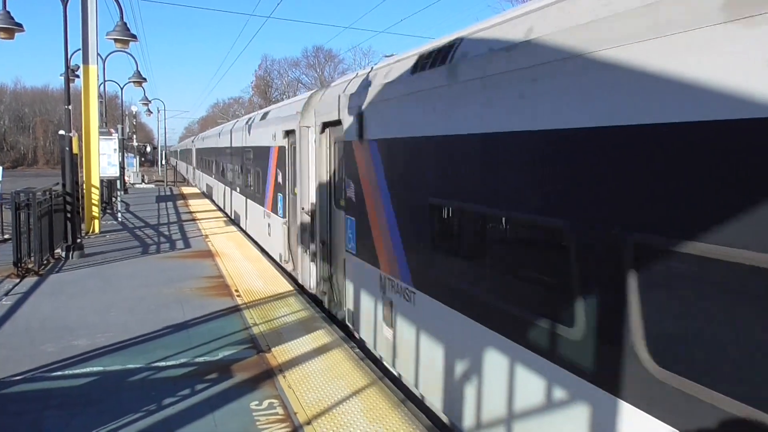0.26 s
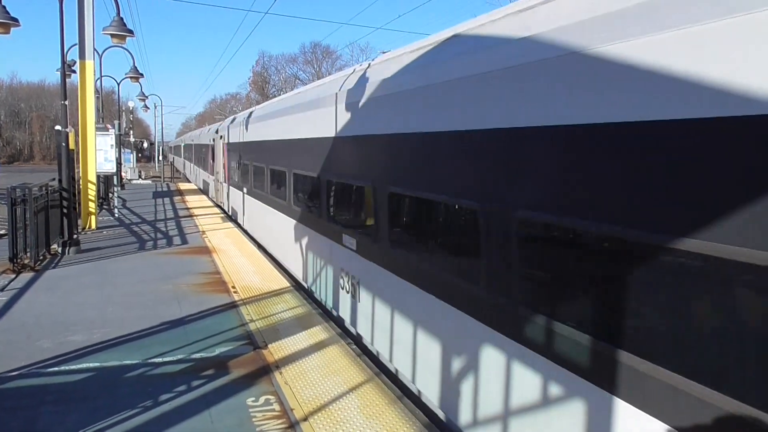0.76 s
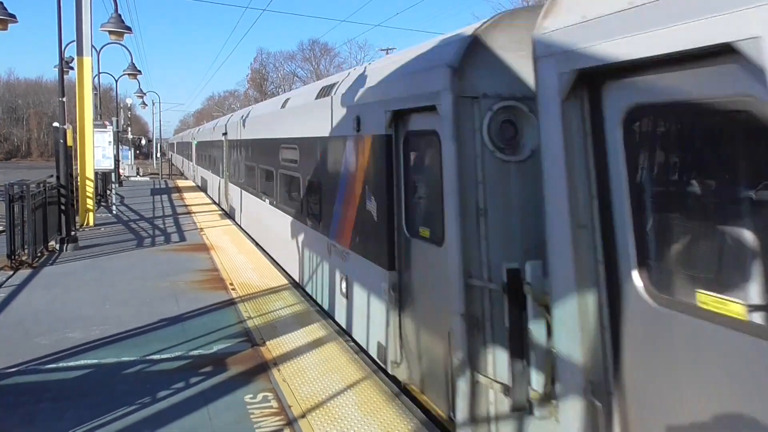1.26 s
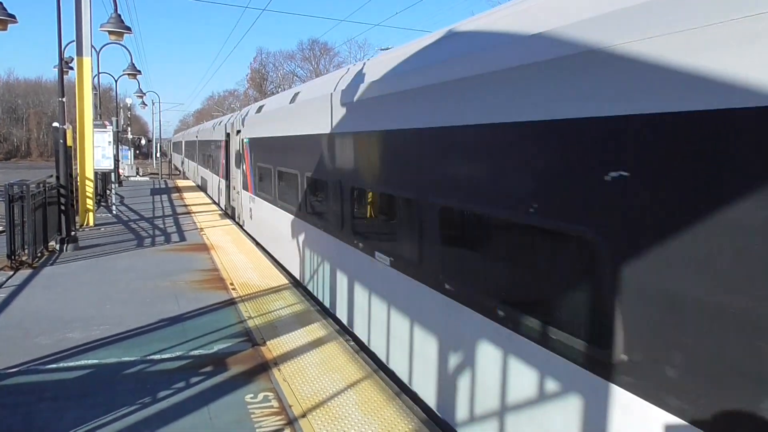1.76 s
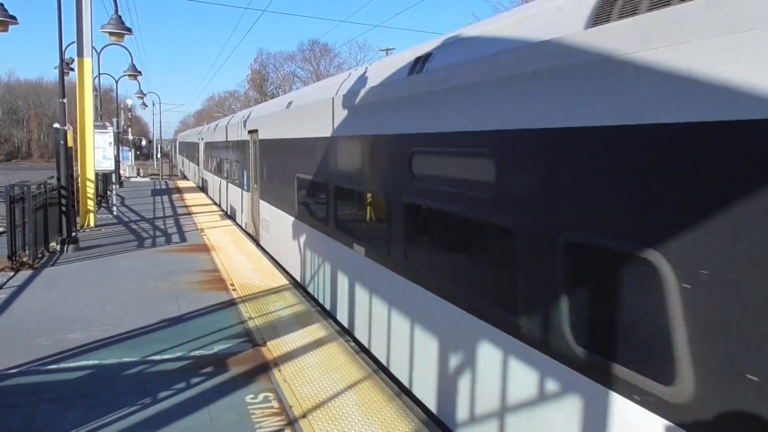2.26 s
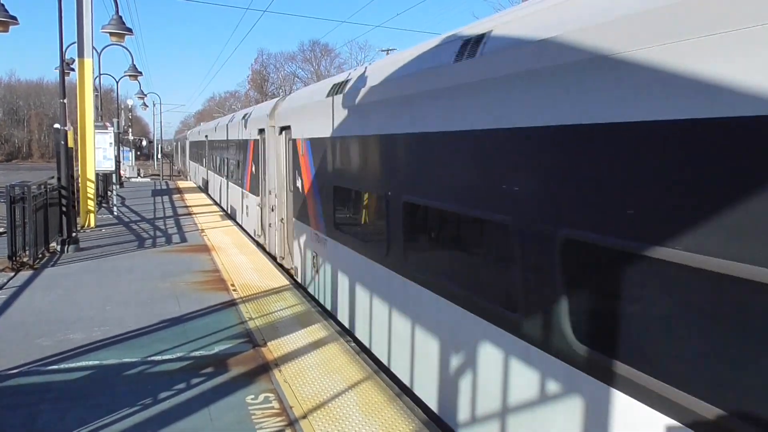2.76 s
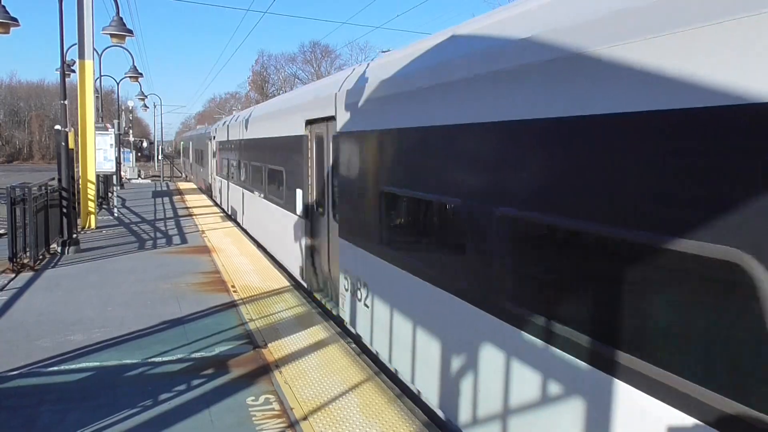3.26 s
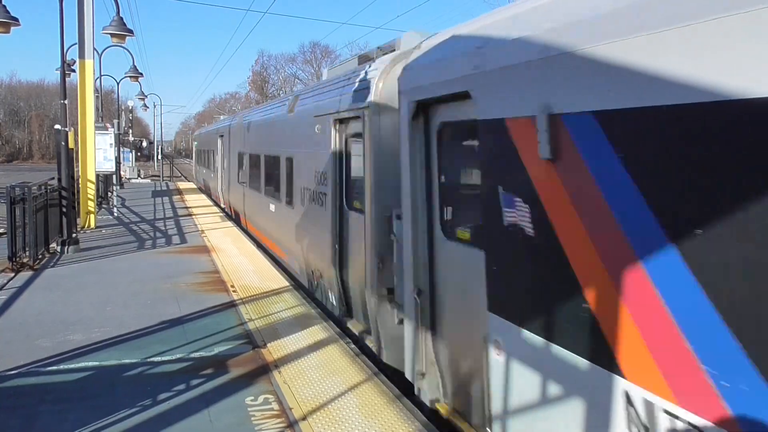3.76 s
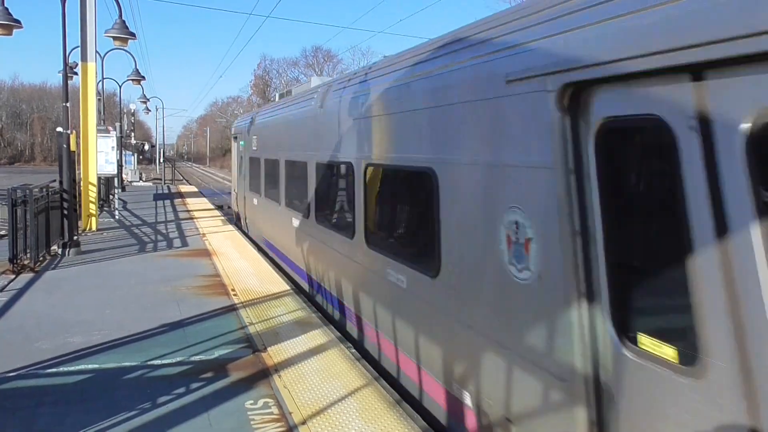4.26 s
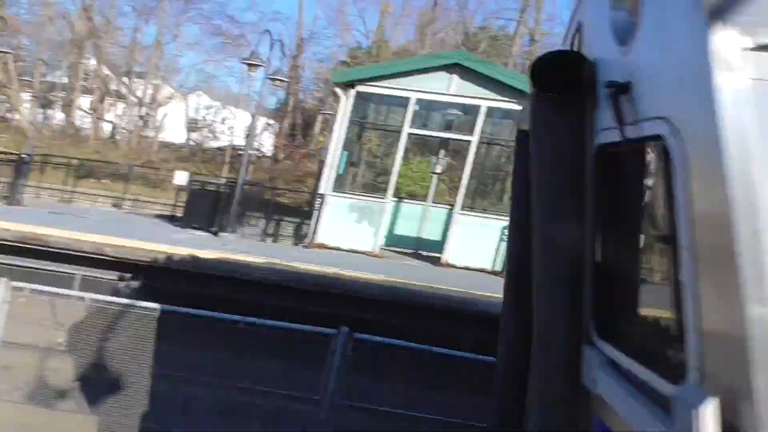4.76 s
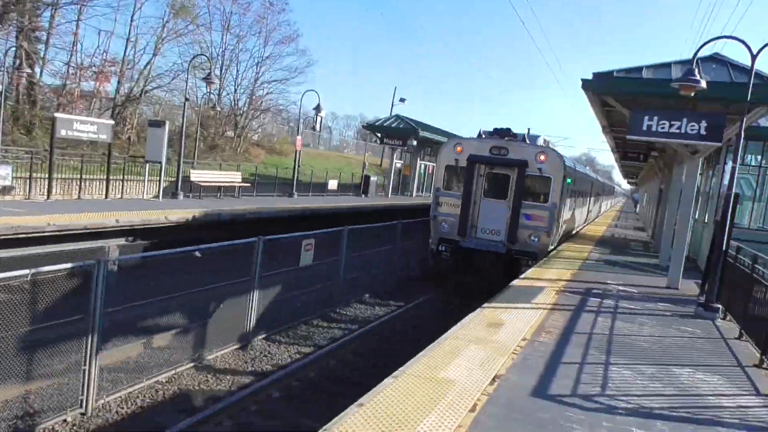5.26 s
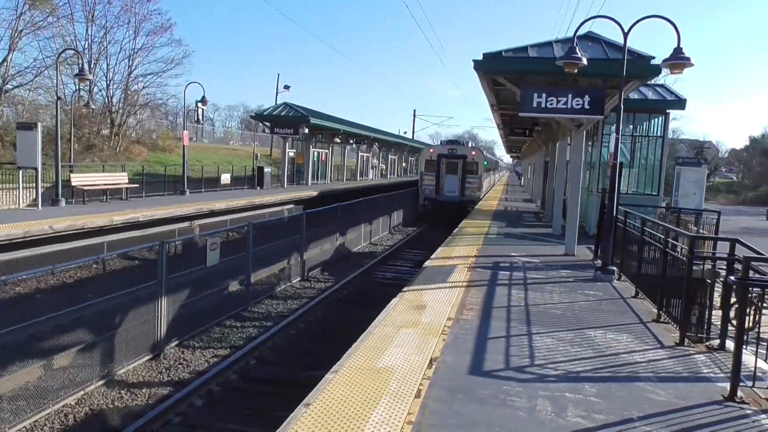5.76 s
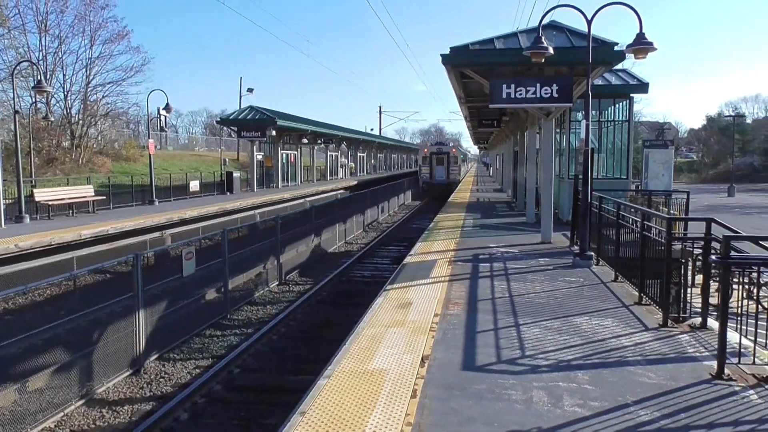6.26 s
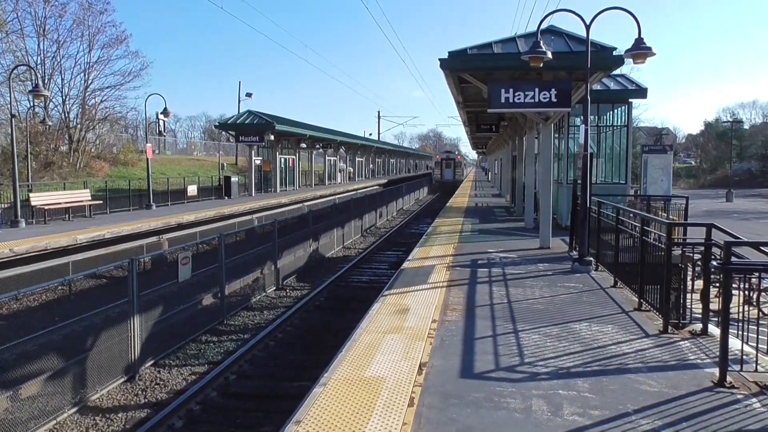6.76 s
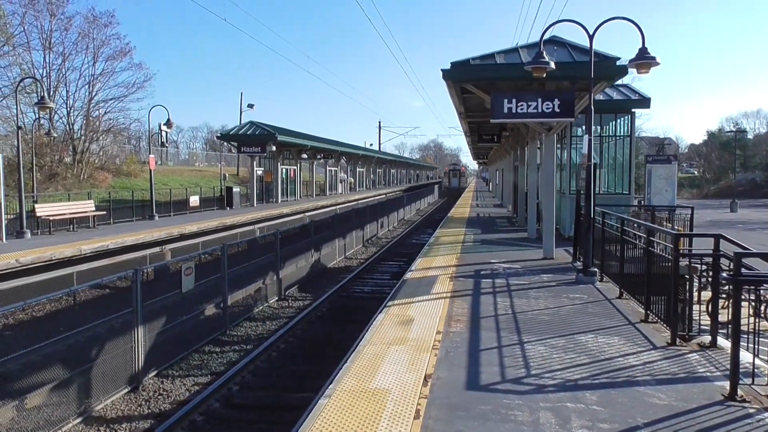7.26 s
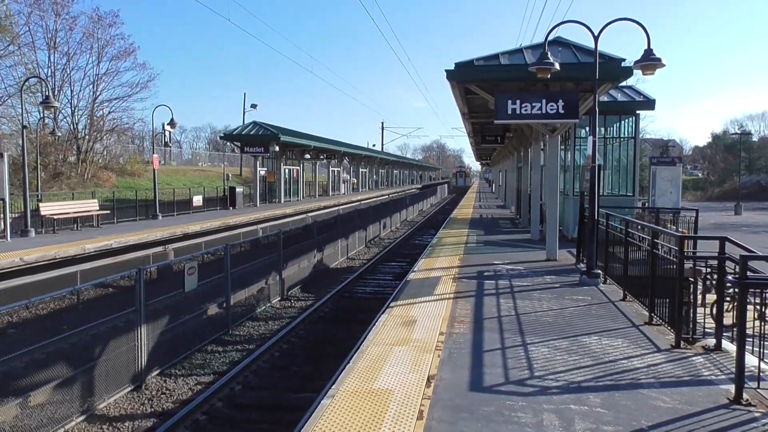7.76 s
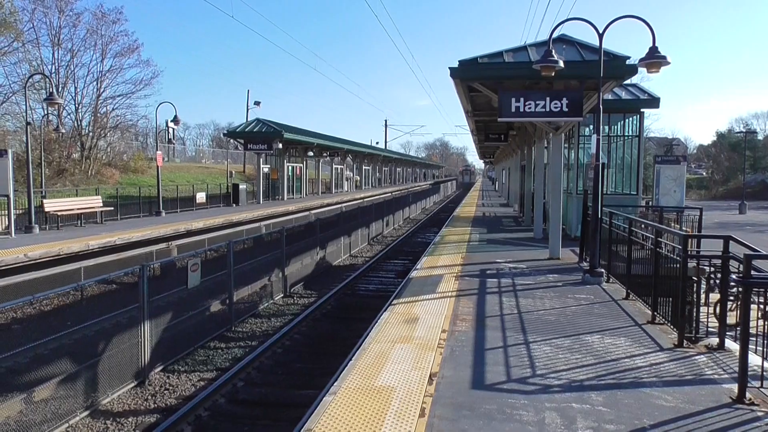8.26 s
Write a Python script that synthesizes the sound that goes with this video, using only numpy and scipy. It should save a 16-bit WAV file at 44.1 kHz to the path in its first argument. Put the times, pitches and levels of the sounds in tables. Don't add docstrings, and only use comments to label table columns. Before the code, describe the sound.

Outdoors on a station platform, a long electric passenger train rushes past at arm's length: broad wheel roar over a wavering low hum, hollow booms at coach gaps, hissing bogies. Dull knocks and sharp rail-joint clacks come midway. After the last coach passes, the roar dulls and recedes, while gusts of slipstream thump the stereo microphone and the image narrows to mono.

```python
import sys
import numpy as np
from scipy import signal
from scipy.fft import rfft, irfft, next_fast_len
from scipy.io import wavfile

SR = 44100
rng = np.random.default_rng(int(sys.argv[2]) if len(sys.argv) > 2 else 0)


def wav_out(sig):
    wavfile.write(sys.argv[1], SR, np.round(np.clip(np.atleast_2d(sig).T, -1, 1) * 32767).astype(np.int16))


N = 375732
PADDED = next_fast_len(N)
HZ = np.fft.rfftfreq(PADDED, 1 / SR) + 1e-3

# (time [s], 0 alongside to 1 far)
DISTANCE = [
    (0, 0.066),
    (4.6, 0.013),
    (5.0, 0.5),
    (5.5, 0.86),
    (6.2, 0.88),
    (7.0, 0.94),
    (8.52, 0.93),
]
# (frequency [Hz], side over the width [dB], right-louder share, right-earlier share)
STEREO_IMAGE = [(60, -9, .05, .1), (200, -16, .1, .5), (300, -2, 0.088, .7), (700, 3, .15, 0.23),
                (2500, 4.5, 0.48, .15), (7000, 7.5, .05, .35), (10000, 15, 0.14, .3),
                (13000, 12.5, 0.49, .2)]


def undb(db):
    return np.exp(np.asarray(db) * (np.log(10) / 20))


def rms_one(x):
    return x / np.sqrt(np.mean(x ** 2) + 1e-20)


def in_time(rows):
    s, *columns = np.transpose(rows)
    return [np.interp(np.arange(N) / SR, s, c) for c in columns]


def at_hz(points, hz, column=1):
    points = np.array(points)
    return np.interp(np.log(hz), np.log(points[:, 0]), points[:, column])


def back(bins):
    return irfft(bins, PADDED)[..., :N]


def drift(rate):
    r = np.exp(-80 * np.pi * rate / SR)
    slow = signal.lfilter([1], [1, -2 * r, r * r], rng.standard_normal(N // 40 + 2002))[2000:]
    return np.interp(np.arange(N) / 40, np.arange(len(slow)), rms_one(slow - slow.mean()))


def coloured(spectrum):
    white = rfft(rng.standard_normal(PADDED))
    return rms_one(back(white * undb(at_hz(spectrum, HZ))))


def swell(s, half):
    out, half = np.zeros(N), max(half, .01)
    first, last = round((s - 5 * half) * SR), round((s + 5 * half) * SR)
    near = np.arange(max(first, 0), min(last, N))
    out[near] = np.exp(-.5 * ((near / SR - s) / half) ** 2)
    return out


def train_levels(far):
    # (time [s], level [dB])
    roar_weight = [(0, -20.5), (.28, -20), (.65, -21.5), (.85, -20), (1.4, -20.5), (1.9, -17.5),
                   (2.45, -16.5), (3.0, -18.5), (3.83, -15.5), (4.0, -17), (4.5, -18), (5.25, -19.5),
                   (5.4, -22), (5.56, -18.5), (6.55, -19.5), (7.0, -24.5), (7.25, -22), (8.52, -28.5)]
    # (time [s], swell [dB], half length [s], brightness [dB])
    bogie_passes = [(.6, 8.5, .17, -0.5), (1.4, 10, .2, 0), (1.96, 1, 0.18, 2), (2.304, 7, 0.24, -1),
                    (3.15, 6.5, .12, 1), (3.962, 8.5, 0.27, -1), (4.504, -1, 0.087, 5.5),
                    (4.907, 9.5, 0.24, 1.5), (5.317, 0, 0.061, -1.5), (5.532, 3, 0.068, -0.5),
                    (6.112, 3.5, 0.22, 0.5), (6.67, 1.5, 0.18, 0.5), (7.24, 3, 0.056, 0),
                    (7.544, 5.5, 0.13, -1.5), (8.24, 1, 0.08, 0), (8.473, 0, 0.034, -1),
                    (2.665, 0, 0.039, -2.5)]
    # (share of roar, share of swell, share of brightness, step when far [dB], fade once gone [dB/s])
    upper_layers = [
        (0.44, 0.86, -0.23, 3.5, 1),
        (-0.019, 1.08, 0.56, 10.5, -4.5),
        (-0.068, .6, 1.5, 14.5, -0.5),
    ]
    tail_gone_s = 5.53
    roll, = in_time(roar_weight)
    lift, bright = sum(np.outer([db, tint_db], swell(s, half)) for s, db, half, tint_db in bogie_passes)
    gone_s = np.maximum(np.arange(N) / SR - tail_gone_s, 0)
    return np.array([roll, *np.array(upper_layers) @ [roll, lift, bright, far, gone_s]])


def rail_noise(roar, hiss, roar_db, hiss_db):
    tone = np.where(HZ < 2600, at_hz(roar, HZ) + roar_db, at_hz(hiss, HZ) + hiss_db)
    mid, own = rfft(rng.standard_normal((2, PADDED))) * undb(tone)
    louder, earlier = (np.clip(at_hz(STEREO_IMAGE, HZ, column=c), -.7, .7) for c in (2, 3))
    return mid, own, louder, earlier


def rolling(patchy_db, shared_db):
    # (frequency [Hz], level [dB per Hz])
    roar_near = [(25, -51), (60, -76), (120, -18.5), (225, -5.5), (300, -2), (430, -1), (720, -0.5),
                 (1040, -10), (1300, -15.5), (1620, -17.5), (1850, -27), (2100, -24), (2350, -28),
                 (2600, -36.5)]
    roar_far = [(25, -29), (100, -24), (200, -9), (300, -8.5), (430, -3.5), (600, 1), (800, 3),
                (1100, -6.5), (1500, -8.5), (1800, -24.5), (2150, -20), (2600, -35.5)]
    hiss_near = [(1530, -33), (2600, 0), (2740, -3), (3140, 1.5), (3560, -0.5), (4080, 2.5), (5460, -6),
                 (6890, -3.5), (8070, -4), (11900, -7), (15000, -20.5), (15600, -27)]
    hiss_far = [(2600, 0.5), (3750, 4), (4300, 0), (5700, -16.5), (7150, -10), (9300, -21), (9720, -18),
                (9950, -17), (10500, -5.5), (11500, -9.5), (11750, -6.5), (12050, -13), (13300, -12),
                (15600, -16)]
    # (time [s], slope [dB/octave])
    coach_tilt = [(0, 0), (2.1, -0.1), (3.85, 0.5), (4.15, -0.5), (4.5, 0.5), (4.9, -0.1), (6.6, -2.5),
                  (7.2, -1), (8.52, -1.3)]
    layer_hz = [700, 3600, 7500, 13000]
    facing_far = -.3

    far = np.clip(in_time(DISTANCE)[0], 0, 1)
    tilt, = in_time(coach_tilt)
    curves = train_levels(far)
    curves -= np.mean(curves, axis=1, keepdims=True)
    pairs = []
    for facing, source in [(1.0, rail_noise(roar_near, hiss_near, -3.5, -37.0)),
                           (facing_far, rail_noise(roar_far, hiss_far, -4.5, -37.0))]:
        mid, own, louder, earlier = source
        earlier = facing * earlier
        diffuse = np.sqrt(1 - louder ** 2 - earlier ** 2)
        side = diffuse * own - (louder + 1j * earlier) * mid
        pairs.append([mid, undb(at_hz(STEREO_IMAGE, HZ)) * side])
    pairs = np.array(pairs, np.complex64)

    octave = np.maximum(np.log2(HZ / 170), 0)
    together = drift(6.0) + .7 * drift(25.0)
    out = np.zeros((2, N))
    for step in np.arange(0, 7, .5):
        hz = 170 * 2 ** step
        band = np.clip(1 - np.abs(octave - step) * 2, 0, 1).astype(np.float32)
        near, away = back(pairs * band)
        place = np.interp(np.log(hz), np.log(layer_hz), range(4))
        low = min(int(place), 2)
        level_db = curves[low] + (place - low) * (curves[low + 1] - curves[low])
        level_db += tilt * np.interp(np.log2(hz / 620), [-1, 1, 2], [-1, 1, 0])
        flicker_db = patchy_db * drift(12.5)
        flicker_db = flicker_db + shared_db * min(hz / 4000, 1) * (1 - 0.87 * far) * together
        gone = far ** 2.5 if hz > 5000 else far
        out += undb(level_db + flicker_db) * (np.sqrt(1 - gone) * near + np.sqrt(gone) * away)
    return out


def hum(wobble_db, side_db):
    # (time [s], low tone [dB], upper tone [dB])
    tone_levels = [(0, -20.5, -18.5), (.2, -15.5, -18.5), (.72, -18.5, -19), (.95, -15, -27),
                   (1.1, -14, -18.5), (1.6, -19, -22), (2.08, -18.5, -26), (2.22, -27, -33),
                   (2.9, -31.5, -40), (3.6, -31, -40), (4.7, -52, -55), (5.15, -27, -34), (5.42, -36, -40),
                   (5.62, -24, -36), (6.5, -24.5, -31.5), (6.97, -33.5, -34), (7.2, -21.5, -27.5),
                   (8.52, -21.5, -29.5)]
    pitches_hz = [285.6, 350.2, 570.8, 393, 337, 474]
    # (follows low 0 or upper 1 tone, alongside [dB against it], far away [dB against it])
    partials = [
        (0, 1, 0),
        (1, -3.5, 0.5),
        (0, -44, -9.5),
        (1, -12, -6),
        (1, -9, -21),
        (1, -14, -16),
    ]
    levels_db, (far,) = in_time(tone_levels), in_time(DISTANCE)
    out = 0
    for hz, (upper, near_db, far_db) in zip(pitches_hz, partials):
        k = int(upper > .5)
        turn = 2 * np.pi * hz * np.arange(N) / SR + (.3 + .05 * k) * drift(2.5)
        level_db = levels_db[k] + near_db + far * (far_db - near_db)
        height = np.sqrt(2) * undb(level_db + wobble_db * (1.5 + .3 * k) * drift(12.4))
        side = -undb(side_db) * (1 - .55 * far) * np.cos(turn - .1)
        out = out + height * np.array([np.sin(turn), side])
    return out


def gusts():
    # (time [s], peak [dB], half length [s], common 1 to opposed 0)
    gust_events = [(.12, -36, 0.054, .4), (0.553, -40, .12, 0.76), (1.13, -31, 0.039, 0.41),
                   (1.393, -34.5, 0.13, 1), (1.65, -34, .12, 0.99), (2.18, -34, 0.11, 0.41),
                   (2.55, -36, .08, 0.17), (2.733, -33, .06, 0.18), (3.37, -39, .07, 0.88),
                   (3.816, -30, 0.1, 0.43), (4.204, -30, .12, 0.18), (4.567, -29.5, 0.12, .1),
                   (5.042, -18.5, 0.051, 0.24), (5.217, -27, 0.084, 0.18), (5.69, -35, .04, .2),
                   (5.867, -30, 0.06, 0.19), (6.12, -31, 0.15, .2), (6.3, -22, 0.08, .25),
                   (6.39, -24, 0.033, .1), (6.605, -16, 0.036, 0.17), (6.757, -14, 0.054, 0.64),
                   (6.877, -18, 0.016, 0.94), (7.06, -32, 0.04, 0.88), (7.353, -13.5, 0.028, 0.85),
                   (7.664, -16.5, 0.031, 0.99), (7.852, -21.5, 0.031, 0.97), (7.968, -21.5, 0.05, 1),
                   (8.118, -21, 0.034, 1), (8.356, -20, 0.062, 1), (8.453, -16.5, 0.041, 1),
                   (.45, -43, .08, .1), (2.24, -38, .04, .1), (3.8, -31, .03, .05), (4.303, -31.5, .03, .5),
                   (5.55, -42, 0.087, .1), (5.92, -31, .04, .1), (6.56, -26, .02, .6),
                   (6.92, -21.5, .02, 0.96), (7.13, -29, .03, 0.91), (7.243, -29, .04, 0.81),
                   (7.44, -25, 0.035, 1), (8.204, -27, .03, 0.99), (.8, -37, 0.12, 1), (7.5, -31, .04, 1),
                   (7.592, -30.5, .03, 0.98), (7.8, -28, .02, 1), (7.91, -27, 0.043, 1),
                   (8.04, -28, .03, 1), (8.27, -27, .04, 0.98), (1.9, -34.5, .07, 1)]
    breeze_db, breeze_opposed_db = -45, -51
    wake_s, wake_db = 7.05, -38
    wake = 1 / (1 + np.exp((wake_s - np.arange(N) / SR) / 0.13))
    common_power = undb(breeze_db) ** 2 + wake * undb(wake_db) ** 2
    opposed_power = (1 - wake) * undb(breeze_opposed_db) ** 2
    power = np.array([common_power, opposed_power])
    for s, peak_db, half, common in gust_events:
        common = np.clip(common, 0, 1)
        power += np.outer([common, 1 - common], undb(peak_db) * swell(s, half)) ** 2
    return np.sqrt(power)


def wind(air, lumpy_db, cycles):
    # (frequency [Hz], level [dB per Hz])
    buffet_colour = [(12, -55), (20, -30), (59, -7.5), (114, 3), (209, 0.5), (312, -3), (397, -9),
                     (600, -19), (780, -42), (1320, -120)]
    # (time [s], peak [dB], frequency [Hz], direction [degrees])
    hard_eddies = [(5.06, -17, 130, 120), (6.5666, -7, 200, 290), (6.588, 2, 170, 88), (6.61, -8, 100, 260),
                   (6.63, -10, 300, 90), (6.712, -13, 85, 87), (7.035, -17, 170, 0.0),
                   (6.655, -17, 90, 0.0), (6.6485, -1, 170, 255), (6.732, -6, 260, 125),
                   (6.749, -6, 238, 30), (6.875, -10, 200, 0.0), (7.347, -6.5, 230, 190),
                   (7.418, -6, 200, -1), (7.641, -8, 250, 183), (7.689, -12, 150, -1),
                   (7.96, -14, 150, 0.0), (8.136, -7, 172, 181), (8.353, -11, 220, 180),
                   (8.33, -14, 130, 0.0), (7.365, -11, 260, 0.0), (8.4252, -1.5, 172, 0.0)]
    lumps = [rms_one(coloured(buffet_colour) * undb(lumpy_db * drift(45.0))) for part in range(2)]
    out = undb(1.0) * air * lumps
    reach = SR // 40
    age = np.arange(-reach, reach) / SR
    for s, peak_db, hz, degrees in hard_eddies:
        push = undb(peak_db) * np.exp(-.5 * (age * hz / cycles) ** 2) * np.cos(2 * np.pi * hz * age)
        direction = [np.cos(np.radians(degrees)), np.sin(np.radians(degrees))]
        out[:, round(s * SR) - reach:][:, :len(age)] += np.outer(direction, push)
    return out


def ducking(air):
    above_db, share, release_db_per_s = -22.5, 0.63, 21
    attack_s, lag_s = 0.021, 0.023
    t = np.arange(N) / SR
    gust_db = 20 * np.log10(np.interp(t - lag_s, t, air[0]))
    over_db = share * np.maximum(gust_db - above_db, 0)
    held_db = np.maximum.accumulate(over_db + release_db_per_s * t) - release_db_per_s * t
    r = np.exp(-1 / (attack_s * SR))
    return undb(-signal.lfilter([1 - r], [1, -r], held_db))


def singing():
    # (time [s], centre [Hz], level [dB], half length [s])
    sung_bands = [(0.48, 7000, -52, 0.17), (.68, 4100, -50, .1), (1.28, 7000, -51, 0.14),
                  (1.3, 4100, -61, 0.12), (2.02, 837, -23.5, 0.37), (2.05, 7300, -49, 0.07),
                  (2.27, 644, -25, 0.18), (2.25, 3300, -51, 0.067), (2.5, 7200, -54, .08),
                  (2.95, 705, -20.5, 0.18), (2.87, 558, -20, 0.05), (3.25, 765, -32, 0.13),
                  (3.74, 820, -26, 0.17), (3.95, 485, -18, 0.043), (4.205, 464, -21.5, 0.11),
                  (4.72, 4200, -47, 0.14), (4.72, 7000, -46, 0.11), (5.05, 10200, -46.5, 0.099),
                  (7.15, 11300, -59, 0.12), (8.22, 14500, -58, .08), (.35, 653, -24, 0.064),
                  (5.2, 690, -18, 0.077), (5.9, 3700, -53, .3), (6.08, 14000, -55, .05),
                  (6.16, 756, -31, 0.35), (0.33, 428, -27.5, .1), (1.26, 880, -30.5, 0.091),
                  (2.6, 840, -30, .1), (3.5, 860, -28, .1), (3.9, 405, -24.5, 0.065), (5.3, 504, -33, .08),
                  (2.1, 1700, -45, 0.13), (2.3, 2170, -45, 0.091), (2.4, 1700, -45, .08),
                  (5.0, 1950, -44, 0.11), (6.9, 1130, -37, .1), (7.1, 1460, -36.5, .1), (6.7, 850, -30, .1),
                  (7.2, 2020, -47, .1), (7.9, 1970, -47, .12), (4.925, 8000, -41, .012),
                  (4.925, 10000, -42, .014), (4.78, 10000, -52, .1), (1.2, 3950, -54, .08),
                  (1.4, 11500, -56, .05), (.8, 6900, -57, .08), (6.4, 7900, -57, .08),
                  (5.4, 9000, -49, .08), (4.8, 4400, -48, .1)]
    width, side_db = .1, -2
    out, noise = np.zeros((2, N)), rng.standard_normal((2, 2, N), np.float32)
    for k, (s, hz, level_db, half) in enumerate(sung_bands):
        shape = swell(s, min(half, .3))
        near = np.flatnonzero(shape)
        band = signal.butter(2, [hz / (1 + width), hz * (1 + width)], "band", fs=SR, output="sos")
        ring = rms_one(signal.sosfilt(band, noise[k % 2][:, near]))
        out[:, near] += undb(level_db) * shape[near] * ring
    return out * undb([[0], [side_db]])


def booms(width_hz):
    # (time [s], frequency [Hz], level [dB], length [s])
    gap_booms = [
        (0.66, 310, -15.5, 0.071),
        (1.5, 306, -24, .06),
        (2.18, 280, -25, 0.055),
        (3.3, 270, -28.5, 0.19),
        (6.2, 1066, -33, 0.55),
        (4.3, 1064, -37, .5),
        (6.5, 630, -31, .3),
        (5.568, 13650, -52, .016),
        (5.732, 13680, -52, .022),
        (5.724, 753, -11.5, 0.0046),
    ]
    t, out = np.arange(N) / SR, np.zeros(N)
    for s, hz, level_db, length in gap_booms:
        turn = 2 * np.pi * (hz * t - width_hz * (t - s) ** 2 / length)
        shape = np.exp(-.5 * ((t - s) / length * 2) ** 2)
        out += np.sqrt(2) * undb(level_db) * shape * np.sin(turn)
    return signal.sosfilt(signal.butter(2, 55.0, "high", fs=SR, output="sos"), out)


def squeak():
    # (time [s], frequency [Hz], level [dB], t60 [s])
    wheel_squeak = (1.503, 14900, -44, .05)
    s, hz, peak_db, t60 = wheel_squeak
    out, age = np.zeros(N), np.arange(SR // 8) / SR
    tone = np.sin(2 * np.pi * hz * age + 1.5 * np.sin(500 * age))
    out[round(s * SR):][:len(age)] += undb(peak_db - 60 * age / t60) * tone
    return out


def knocks():
    # (time [s], peak [dB], frequency [Hz])
    dull_knocks = [
        (2.19, -9, 570),
        (2.514, -8, 705),
        (2.53, -9, 760),
        (2.808, -9, 680),
        (3.13, -11, 780),
        (3.368, -11, 520),
        (4.2265, -6, 450),
    ]
    t60 = .05
    out, age = np.zeros(N), np.arange(SR // 10) / SR
    for s, peak_db, hz in dull_knocks:
        out[round(s * SR):][:len(age)] += undb(peak_db - 60 * age / t60) * np.sin(2 * np.pi * hz * age)
    return signal.sosfilt(signal.butter(2, 300, "high", fs=SR, output="sos"), out)


def clacks(level_db, width_db):
    # (time [s], peak [dB], ring t60 [s])
    joint_clacks = [(2.335, -31, .06), (2.4159, -31, 0.08), (2.492, -30, 0.14), (2.9003, -27.5, 0.15),
                    (3.7813, -29, 0.064), (3.858, -21.5, 0.12), (3.8884, -30, 0.08), (3.9823, -24.5, 0.097),
                    (4.033, -34, .05), (4.063, -28.5, 0.1), (4.1415, -22.5, 0.11), (4.2253, -30, 0.08),
                    (2.548, -36, .05), (3.7, -34, .05), (3.874, -30, .04), (3.902, -30, .05),
                    (3.921, -32, .04), (3.998, -31, .04), (4.16, -32, .04)]
    # (frequency [Hz], level [dB per Hz])
    clack_colour = [(700, -1), (2500, 2.5), (5000, 2), (9000, -1.5), (12500, -10), (15500, -23)]
    t, shape = np.arange(N) / SR, np.zeros(N)
    for s, peak_db, t60 in joint_clacks:
        start = round(s * SR)
        age = t[start:start + SR // 4] - s
        shape[start:][:len(age)] += undb(peak_db + level_db - 60 * age / max(t60, .01))
    return shape * [coloured(clack_colour), undb(width_db) * coloured(clack_colour)]


def whistles(wobble_db):
    # (frequency [Hz], width [Hz], level [dB], sets in [s])
    wire_whistles = [
        (9720, 160, -71, 6.8),
        (11780, 300, -60, 7.3),
        (14700, 900, -60, 7.4),
        (10550, 350, -65, 5.8),
    ]
    t, out = np.arange(N) / SR, 0
    for hz, width_hz, level_db, s in wire_whistles:
        band = signal.butter(2, [hz - width_hz / 2, hz + width_hz / 2], "band", fs=SR, output="sos")
        fade = 1 / (1 + np.exp((s - t) / .15))
        height = undb(level_db + wobble_db * drift(4.0)) * fade
        out = out + height * rms_one(signal.sosfilt(band, rng.standard_normal(N)))
    return out


def ticks(t60, level_db):
    # (time [s], peak [dB], frequency [Hz])
    near_ticks = [(7.0, -38, 8600), (7.3801, -39, 8000), (7.447, -31, 8100), (7.8341, -40, 8000),
                  (8.0975, -35.5, 8000), (8.1074, -40, 8000), (8.2811, -42, 8000), (8.3694, -43, 9000),
                  (7.037, -42, 10000), (7.84, -42, 8500), (8.158, -43, 8500), (8.378, -45, 9000)]
    out, age = np.zeros(N), np.arange(SR // 8) / SR
    for s, peak_db, hz in near_ticks:
        band = signal.butter(2, [0.75 * hz, 1.35 * hz], "band", fs=SR, output="sos")
        burst = rng.standard_normal(len(age)) * undb(peak_db + level_db - 60 * age / t60)
        out[round(s * SR):][:len(age)] += signal.sosfilt(band, burst)
    return out


def scene():
    # (time [s], side level against mid [dB])
    stereo_width = [(0, -10), (4.55, -10.5), (4.85, -9.5), (5.1, -14.5), (5.4, -15), (5.6, -14),
                    (6.75, -16.5), (6.97, -48), (7.05, -43), (7.18, -42), (7.36, -24), (7.44, -67),
                    (7.62, -44), (7.7, -62), (7.84, -48), (7.9, -64), (8.52, -60)]
    width, air = undb(in_time(stereo_width)[0]), gusts()
    train = rolling(0.95, 0.59) + hum(0.71, -6.5) + clacks(-8.0, 5.1)
    mid, side = ducking(air) * undb(0.1) * train
    sung_mid, sung_side = singing()
    air_mid, air_side = wind(air, 2.6, .45)
    mid = mid + sung_mid + booms(3.0) + squeak() + knocks()
    mid = mid + air_mid + whistles(2.1) + ticks(0.021, 1.2)
    side = width * (side + sung_side) + air_side
    return np.array([mid + side, mid - side])


def band_limit(x):
    return signal.sosfilt(signal.butter(12, 15750, fs=SR, output="sos"), x)


def record(dry):
    ceiling = .99
    held = np.tanh(np.abs(dry / ceiling) ** 3) ** (1 / 3) * np.sign(dry) * ceiling
    return band_limit(held)


dry = scene()
out = record(dry)
wav_out(out)
```